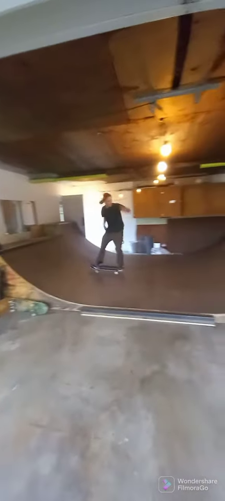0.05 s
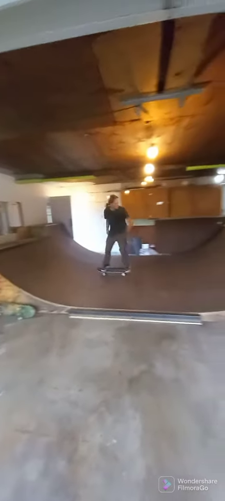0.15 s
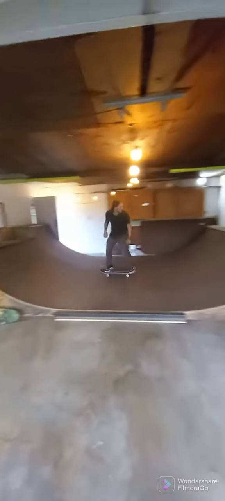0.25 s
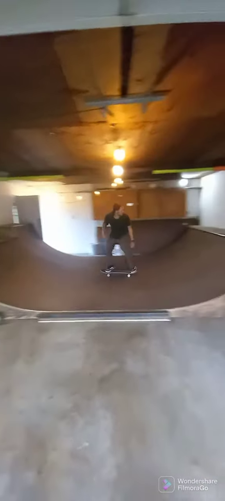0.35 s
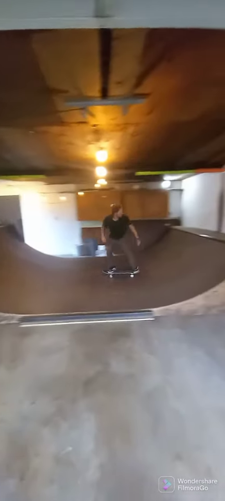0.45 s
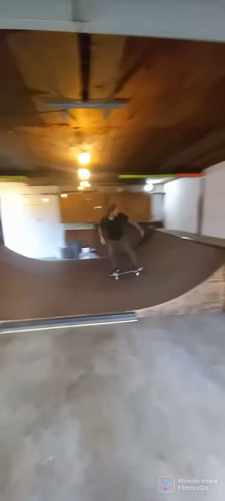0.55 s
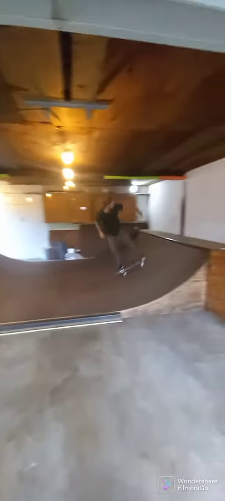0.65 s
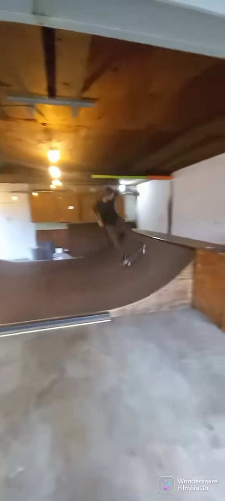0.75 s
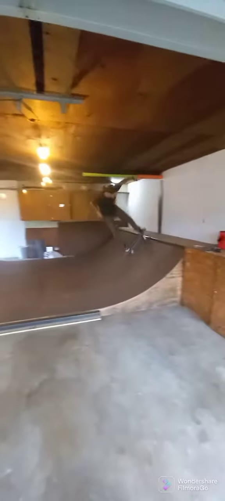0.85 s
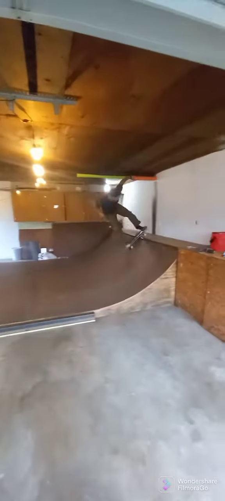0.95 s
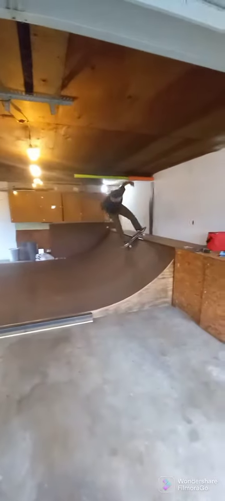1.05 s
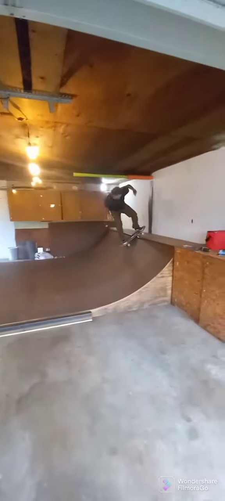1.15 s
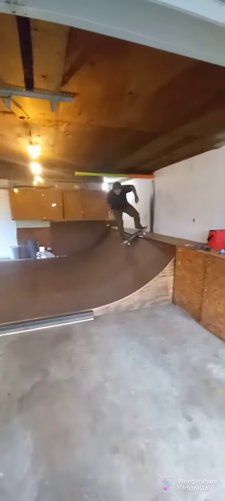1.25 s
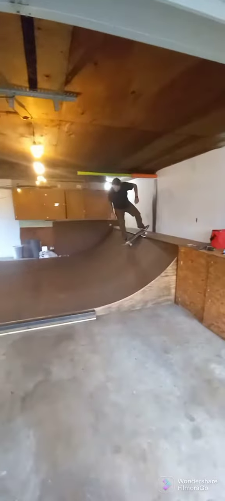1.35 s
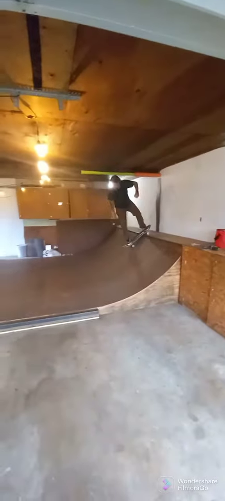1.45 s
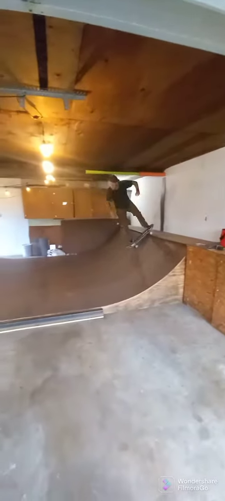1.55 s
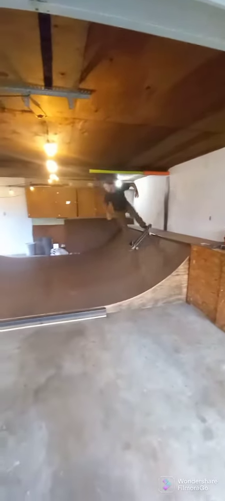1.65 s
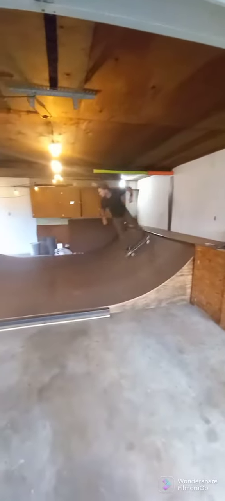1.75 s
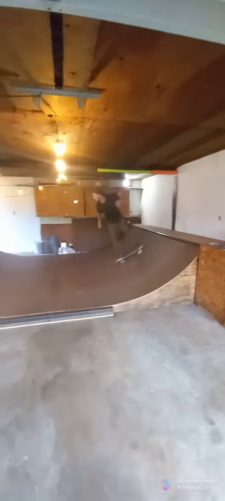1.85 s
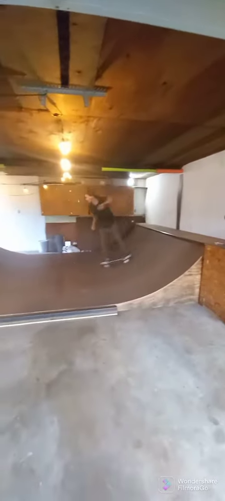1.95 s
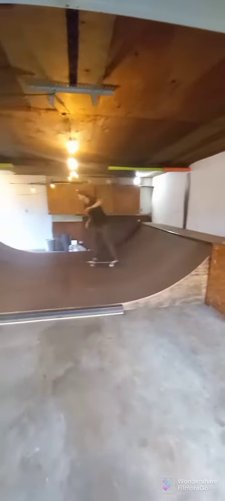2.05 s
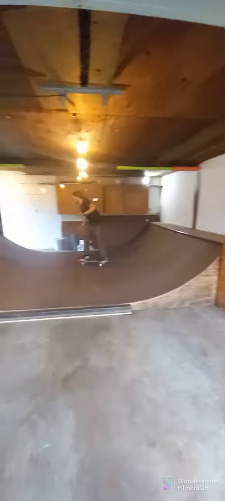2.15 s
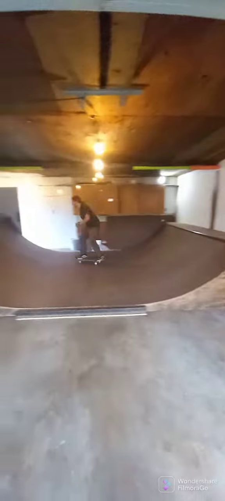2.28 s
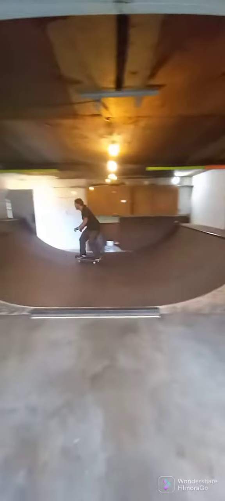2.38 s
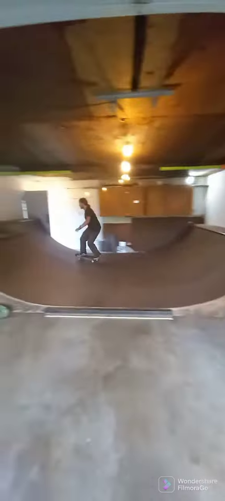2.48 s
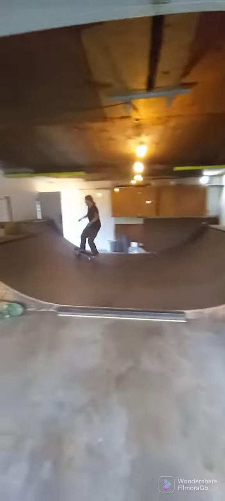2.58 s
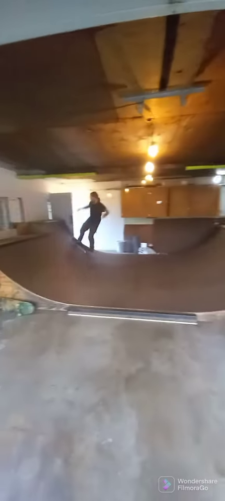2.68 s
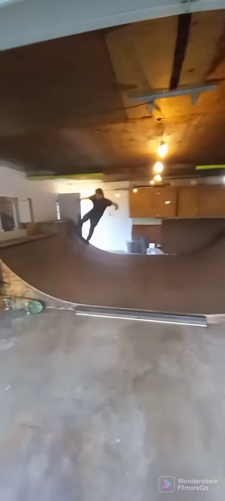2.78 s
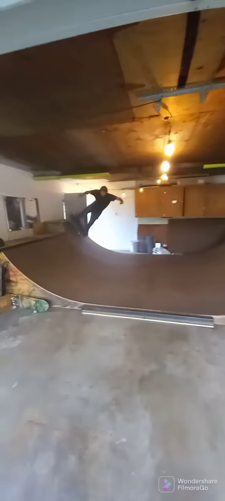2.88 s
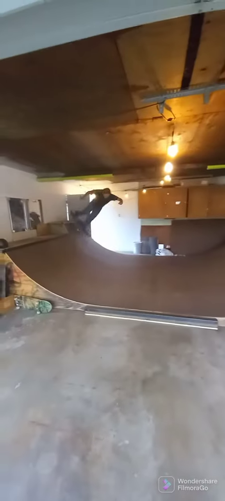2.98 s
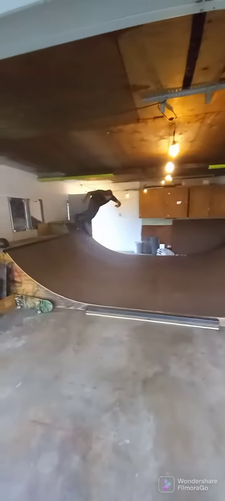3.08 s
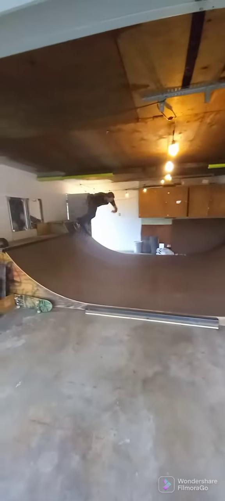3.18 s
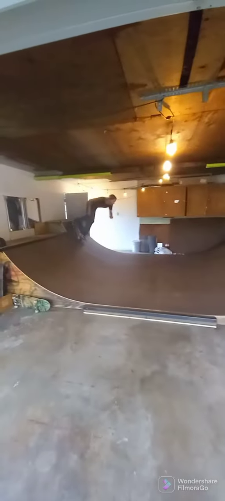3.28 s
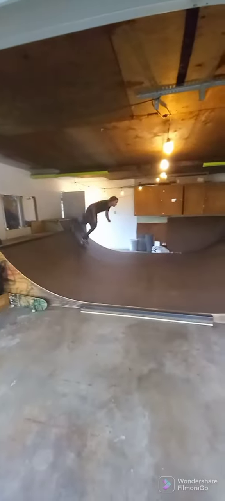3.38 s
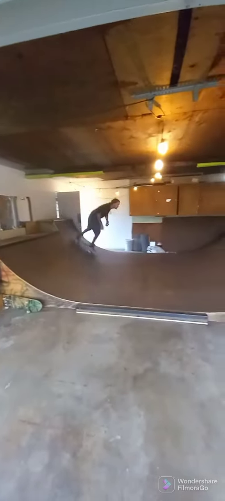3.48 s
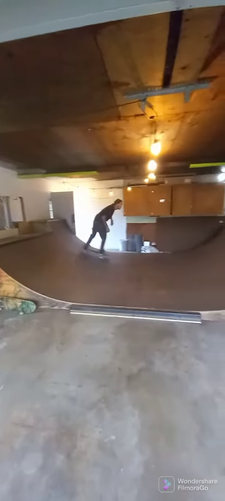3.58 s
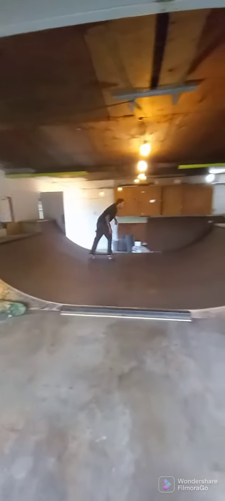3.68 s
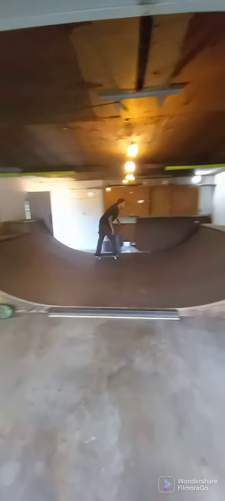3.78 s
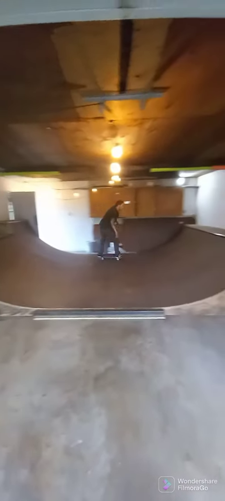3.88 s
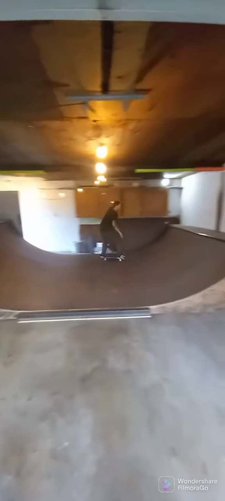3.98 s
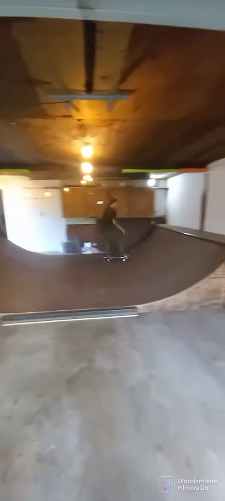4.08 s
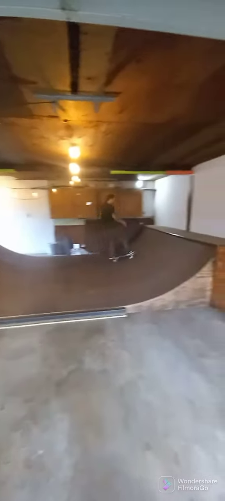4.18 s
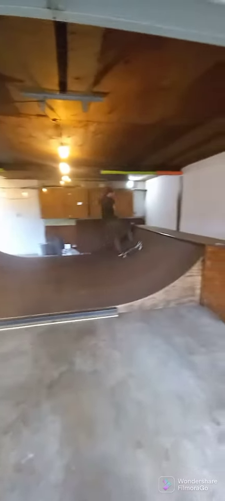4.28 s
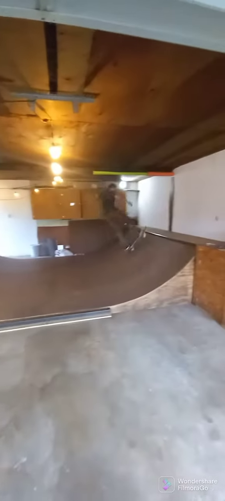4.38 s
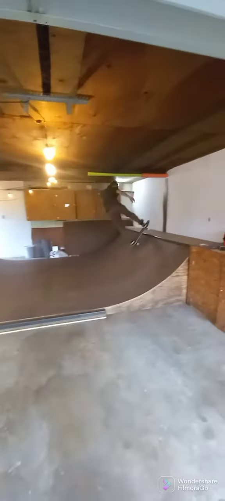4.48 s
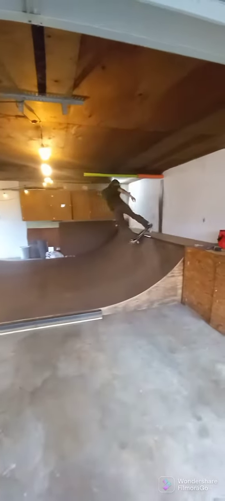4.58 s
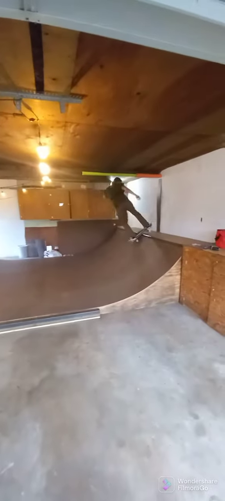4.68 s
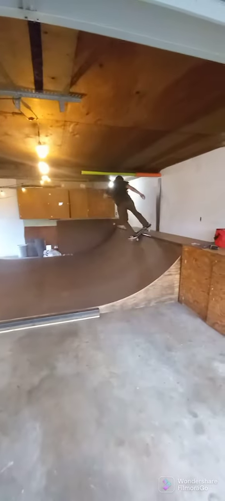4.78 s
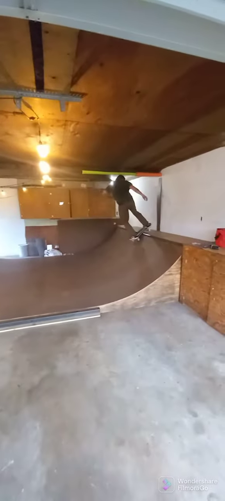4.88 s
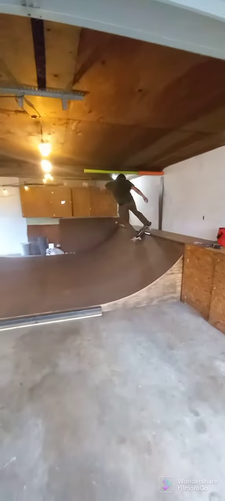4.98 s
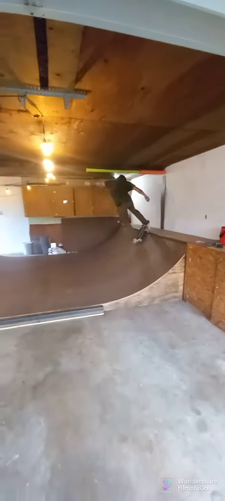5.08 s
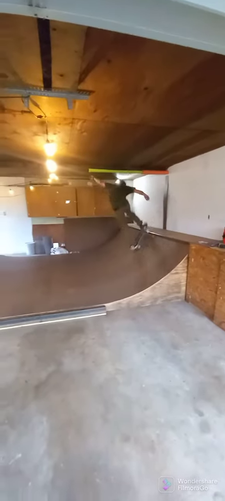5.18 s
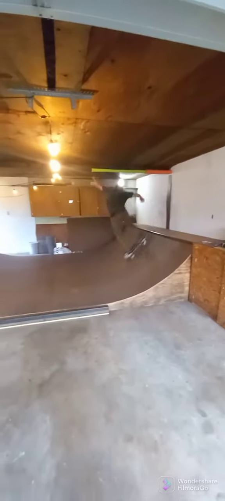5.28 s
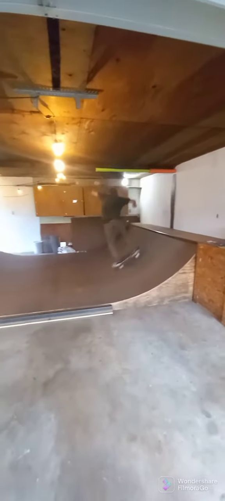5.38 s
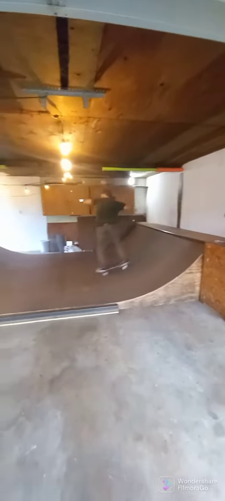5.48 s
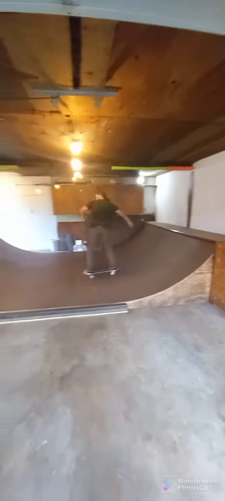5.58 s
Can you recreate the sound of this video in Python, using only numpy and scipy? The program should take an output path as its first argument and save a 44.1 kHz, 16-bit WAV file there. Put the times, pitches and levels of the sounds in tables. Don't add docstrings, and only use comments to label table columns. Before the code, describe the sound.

A skateboard rumbles back and forth on a hollow wooden ramp in an echoing garage, with sharp clacks at the steel edge.

```python
import sys
import numpy as np
from scipy import signal
from scipy.fft import rfft, irfft, next_fast_len
from scipy.io import wavfile
from scipy.ndimage import map_coordinates

SR = 44100
rng = np.random.default_rng(int(sys.argv[2]) if len(sys.argv) > 2 else 0)


def undo_db(level):
    steps = np.asarray(level, float) / 20
    return 10 ** steps


def master_out(mix):
    frames = np.transpose(np.atleast_2d(mix))
    ceiling = np.clip(frames, -1, 1)
    pcm = np.round(ceiling * 32767).astype(np.int16)
    wavfile.write(sys.argv[1], SR, pcm)


N = 248283


def unit(x):
    return x / np.sqrt(np.mean(x ** 2) + 1e-20)


def along(points, hz):
    f, value = np.transpose(points)
    return np.interp(np.log(hz + 1), np.log(f + 1), value)


def filtered(x, response):
    size = next_fast_len(x.shape[-1] + SR // 4)
    spectrum = rfft(x, size) * response(np.fft.rfftfreq(size, 1 / SR))
    return irfft(spectrum, size)[..., :x.shape[-1]]


def modes(table):
    def response(f):
        total = 0
        for k, (centre, width, db) in enumerate(table):
            ring = 1j * f * width / (centre * centre - f * f + 1j * f * width)
            total = total + (-1) ** k * undo_db(db) * ring
        return total
    return response


def causal(gain):
    cepstrum = irfft(np.log(gain + 1e-6))
    half = len(cepstrum) // 2
    cepstrum[1:half] *= 2
    cepstrum[half + 1:] = 0
    return np.exp(rfft(cepstrum))


def wobble(rate):
    knots = rng.standard_normal(int(N * rate / SR) + 4)
    return map_coordinates(knots, [np.arange(N) * rate / SR])


def bumps(size, rate, scatter_db, smooth):
    chance, height, grain = rng.random(size), rng.exponential(size=size), rng.standard_normal(size)
    kicks = np.sign(grain) * (chance < rate / SR) * undo_db(scatter_db * np.minimum(height, 2.2))
    return unit(kicks) + smooth * grain


def lingering(db, t60):
    keep = 10 ** (-6 / (t60 * SR))
    return np.sqrt(signal.lfilter([1 - keep], [1, -keep], undo_db(2 * db)))


# (f/Hz, width/Hz, level/dB)
BOOM = [(66.3, 8.7, -7.5), (84.7, 12.3, 1), (111.5, 16.3, 5), (114.2, 18.9, 0.5), (135, 1.8, -31)]
# (f/Hz, width/Hz, level/dB)
SPANS = [(115.6, 16.8, -0.5), (123.2, 16.3, 0), (156, 20.8, -5), (170, 16, -3)]
# (f/Hz, width/Hz, level/dB)
PANEL = [(178, 33.3, 1.5), (199.8, 26.8, -0.5), (241.4, 12, 2.5), (331.6, 38, -1), (380, 57, -4),
         (440, 106, -14), (556, 134, -15), (632, 146, -15.5), (704, 170, -27.5)]


def rumble(load):
    pressure, speed, short, stall = ride()
    road = bumps(N, rate=200, scatter_db=1, smooth=0.5)
    short = np.clip(short, 0, 1)
    air = unit(filtered(road, modes(BOOM)))
    spans = unit(filtered(road, modes(SPANS)))
    hollow = np.sqrt(1 - short) * air + np.sqrt(short) * spans
    panels = sum(undo_db(2.2 * wobble(18)) * filtered(road, modes(PANEL[first::3])) for first in range(3))
    hollow_db = -24 + pressure + stall + 1.8 * load
    panel_db = -27.5 + speed + 1.7 * stall + 0.69 * load
    return undo_db(hollow_db) * hollow + undo_db(panel_db) * unit(panels)


# (t/s, rider's pressure level/dB, wheel speed level/dB, share of short spans underfoot 0-1)
RIDE = [(0, 22, 12.5, 0.78), (0.079, -6, -6, 0.4), (.45, -1.5, -3, 0.37), (.72, 1.5, 1.5, 0.75),
        (.93, -4, -8.5, 0.13), (1.7, -6, -7.5, 0.36), (2.07, -6.5, 0, 0.43), (2.32, -3, -5.5, 0),
        (2.5, -0.5, 2, 0.36), (2.75, 5.5, 4.5, 1), (2.97, -2.5, 0.5, 0.1), (3.5, 3.5, -6, 0),
        (3.7, -2.5, 0.5, 0.53), (4.03, -1, 2, 0.4), (4.3, 6.5, 4, 0.25), (4.47, -3, -6.5, 0),
        (5.15, -8, -4, 0.36), (5.63, 1.5, 5.5, 0.4)]


def ride():
    s, *controls = np.transpose(RIDE)
    t = np.arange(N) / SR
    return *[np.interp(t, s, control) for control in controls], stalled()


# (wheels unload t/s, wheels land t/s, what still trembles level/dB)
STALLS = [
    (1.17, 1.665, -40),
    (3.027, 3.426, -28),
    (4.503, 4.665, -4),
    (4.723, 5.11, -15.5),
]


def stalled():
    unload_db_per_s, land_s = 136, 0.03
    t, loss = np.arange(N) / SR, 0
    for up, down, db in STALLS:
        fallen = min(up - db / unload_db_per_s, down - 2 * land_s)
        loss = loss + np.interp(t, [up, fallen, down - land_s, down], [0, db, db, 0])
    return loss


# (f/Hz, level/dB per Hz)
WHEEL = [(290, -46), (500, -3), (897, -8), (1180, -12), (1480, -8.5), (2430, -23), (3000, -20.5),
         (3900, -51), (6600, -120)]
# (f/Hz, level/dB per Hz)
BEARING = [(1350, 0), (2300, 0), (2800, -4), (3320, 1), (3670, -1.5), (4050, -1), (4500, -2.5), (5520, -3),
           (6720, -5.5), (8110, -12), (10500, -14), (15100, -13.5), (16300, -24)]


def hiss(load):
    _, speed, _, stall = ride()
    tread = bumps((2, N), rate=330, scatter_db=-0.5, smooth=2.1)
    tread = unit(filtered(tread, lambda hz: undo_db(along(WHEEL, hz))))
    tread_db = -42 + 0.2 * speed + 0.68 * stall + 0.6 * load
    balls = bumps((2, N), rate=1100, scatter_db=14.0, smooth=4.8)
    balls = unit(filtered(balls, lambda hz: undo_db(along(BEARING, hz))))
    spin_power = undo_db(2 * (-51 + 0.25 * speed + 0.24 * stall))
    spin_db = 10 * np.log10(spin_power + carving())
    chatter_db = 0.5 * load + 2 * wobble(45)
    return lingering(tread_db, t60=0.76) * tread + lingering(spin_db + chatter_db, t60=0.21) * balls


# (middle t/s, length t/s, level/dB)
CARVES = [(0.0, 0.017, -35), (0.114, 0.097, -40), (0.31, 0.027, -54), (0.573, .12, -41),
          (0.796, 0.047, -42), (.89, .08, -42), (1.527, 0.05, -49), (2.005, .06, -40), (2.35, 0.18, -45),
          (2.51, .04, -43.5), (2.73, 0.21, -35.5), (2.916, 0.15, -46), (3.534, 0.11, -40.5),
          (3.798, 0.11, -36.5), (3.964, 0.17, -44.5), (4.201, 0.086, -33.5), (4.413, 0.12, -38),
          (4.585, 0.12, -44.5), (4.916, 0.11, -50.5), (5.092, 0.079, -40.5), (5.22, 0.07, -42),
          (5.5, 0.077, -42.5), (5.63, 0.08, -39)]


def carving():
    t = np.arange(N) / SR
    return sum(undo_db(2 * db) * np.exp(-(2 * (t - s) / length) ** 2) for s, length, db in CARVES)


# (centre f/Hz, width f/Hz)
BLOW_BANDS = [
    (110, 200),
    (550, 950),
    (2000, 2300),
    (5200, 4000),
    (11500, 8500),
]
# (f/Hz, width/Hz, level/dB)
DECK = [(324, 25, -1.5), (677, 108, 3), (897, 8.8, -4.5), (1198, 12, -5), (1453, 51, -1), (1734, 44, -2),
        (2096, 140, -3.5), (2500, 31, -1.5), (2950, 27, -9.5)]
# (f/Hz, level/dB)
MIC = [(25, -17.5), (50, 3), (80, 4.5), (6500, 1), (8200, -1), (10000, -4.5), (12500, 0), (16000, -7)]
# (t/s, strength level/dB, weight level/dB, wood level/dB, edge level/dB)
STRIKES = [(0.94, -13, -6.5, 8.5, -9.5), (0.9574, -19.5, 10, 11, -7), (0.995, -19.5, 16.5, 6, -4.5),
           (1.046, -8, -7, -8.5, -15.5), (1.061, -19, -2, -0.5, -14), (1.4351, -32, 5, -1.5, -2),
           (1.5049, -41, 22, 15, 2), (1.5212, -32.5, 18.5, 11, -7), (1.6702, -27.5, 12, 5.5, -7),
           (1.6988, -28.5, -4, 7, -6), (1.766, -25.5, -4, 3.5, -1), (1.7791, -22.5, 10.5, 3.5, -11),
           (2.972, -19.5, 3, 9, -6), (2.995, -18.5, 12.5, 3.5, -7), (3.02, -25.5, 8.5, 0, -10),
           (3.3689, -20, -3, 8, 0), (3.385, -16, 15, 6, -7), (4.6408, -7.5, -5, -3, -24),
           (4.6568, -30.5, 13, 2, 2), (4.8663, -35.5, -2, 6, -2), (4.9325, -37, 6.5, 8.5, 2),
           (5.0789, -30.5, 17.5, 12.5, -6), (5.1813, -26, 9.5, 11, -3.5), (5.304, -16.5, 18, 11, -7)]
# (t/s, strength level/dB, weight
# level/dB, wood level/dB, edge level/dB)
JOINTS = [(0.012, -48, 24, 23, -15), (0.117, -41.5, 25, 33, -15), (0.2934, -44.5, 1, 16, 8),
          (.672, -43.5, 22, 20.5, -11), (0.8512, -31.5, 13.5, 9.5, -3), (2.069, -46, 25, 27, -15),
          (2.419, -43, 24, 9, -15), (2.5028, -34.5, 13, 9, -1), (2.62, -34, 24.5, 10, -15),
          (2.79, -35, 12, 22, -14), (2.9, -26.5, 19, 9.5, -8), (3.13, -50, 28, 0, -12),
          (3.189, -45, 12, 0, -19), (3.609, -34.5, 20.5, 13, -4), (3.8385, -44, 16, 23, -10),
          (3.9465, -33.5, 19, 15.5, -17), (4.1573, -50, 13, -6, -6), (5.5046, -37.5, 23, 24, -12)]


def blows():
    out, t = np.zeros((2, N + SR)), np.arange(SR // 4) / SR
    centre, width = np.array(BLOW_BANDS, float).T
    ring = lambda hz: 1 + np.abs(modes(DECK)(hz)) + 1.57 * np.abs(modes(BOOM)(hz))
    # level in dB, then dB per dB of edge
    rows = [(*row, -6, 0.01) for row in STRIKES] + [(*row, -15.5, -0.4) for row in JOINTS]
    for s, db, weight_db, wood_db, edge_db, crack_db, sharper in rows:
        splutter = rng.standard_normal(len(t)) * np.exp(-(t / 0.0035) ** 2)
        click = t == 0
        push = np.array([click, 0.18 * click + splutter / np.linalg.norm(splutter)])
        band_db = np.array([weight_db, wood_db, 0, crack_db + sharper * edge_db, edge_db])
        per_hz = band_db - 10 * np.log10(width / width[2])
        centre[1] = np.clip(726 * 2 ** (-weight_db / 22), 304, centre[2] / 2)
        tone = np.c_[centre, per_hz]
        colour = lambda hz: causal(undo_db(along(tone, hz) + along(MIC, hz)) * ring(hz))
        start = round(s * SR)
        out[:, start:start + len(t)] += undo_db(db + 28) * filtered(push, colour)
    return out[:, :N]


# (t/s, lag of the left port in ms)
PLACE = [(0, 0.077), (1, .3), (1.8, 0.17), (2.3, 0.052), (3, -0.22), (3.4, -0.32), (3.9, 0.136),
         (4.6, 0.31), (5.3, 0.38), (5.63, 0.13)]


def direct(x):
    lag = np.interp(np.arange(N) / SR, *np.transpose(PLACE)) * SR / 2000
    late = lambda hz, s: np.exp(-2j * np.pi * hz * s)
    bright = lambda hz: (1 + 2.2j * hz / 2500) / (1 + 1j * hz / 2500)
    straight = lambda hz: (1 + 0.25 * late(hz, 0.0025)) * bright(hz)
    walls = lambda hz: (0.83 * late(hz, 0.0138) - 0.58 * late(hz, 0.022)) / (1 + 1j * hz / 3000)
    x = filtered(x, lambda hz: straight(hz) + walls(hz))
    return np.array([map_coordinates(x, [np.arange(N) - side * lag], mode="nearest") for side in (1, -1)])


# (f/Hz, t/s)
ROOM = [(60, 0.37), (250, 0.31), (1000, 0.46), (4000, 0.51), (12000, 0.45)]


def garage(x):
    hop = SR // 12
    out, padded = np.zeros((2, N + 2 * SR)), np.pad(x, (hop, 2 * hop))
    fade = np.sin(np.pi * np.arange(2 * hop) / (2 * hop))
    for start in range(0, N + hop, hop):
        hz, t, z = signal.stft(rng.standard_normal((2, SR // 2)), SR, nperseg=256)
        fall = undo_db(-60 * t / along(ROOM, hz)[:, None])
        fall = fall * (1.4 - np.exp(-t / 0.006)) * (1 + 0.46 * np.exp(-t / 0.026))
        fall = fall / np.linalg.norm(fall, axis=1, keepdims=True)
        tail = signal.istft(z * fall, SR, nperseg=256)[1]
        tail = tail / np.linalg.norm(tail[0])
        moment = padded[start:start + 2 * hop] * fade
        wet = signal.fftconvolve(moment[None], tail, axes=1)
        out[:, start:start + wet.shape[1]] += wet
    return out[:, hop:hop + N]


# (f/Hz, correlation -1 to 1)
ALIKE = [(60, 0.95), (130, 1), (290, 0.86), (640, -0.025), (1410, -0.014), (3100, 0.07), (6820, 0.11),
         (15000, -0.019)]
# (f/Hz, level/dB)
LEAN = [(60, -2.5), (110, 0.5), (200, -1), (380, -4), (700, 1), (1290, -3.5), (2380, 0), (4400, -3),
        (8120, 1), (15000, -1)]


def pair(x):
    turn = lambda hz: np.arccos(np.clip(along(ALIKE, hz), -1, 1)) / 2
    mid, side = filtered(x, lambda hz: np.array([np.cos(turn(hz)), np.sin(turn(hz))]))
    lean = lambda hz: undo_db(along(LEAN, hz) / 2 * np.array([[1], [-1]]))
    return filtered(np.array([mid + side, mid - side]), lean)


# (f/Hz, level/dB per Hz)
FLOOR = [(24, -45), (40, 14.5), (130, -1), (322, -15), (1650, -8), (2730, -30), (4510, -49), (15100, -71),
         (16300, -49)]


def room_hum():
    noise = rng.standard_normal((2, N))
    return undo_db(-47.5) * unit(filtered(noise, lambda hz: undo_db(along(FLOOR, hz))))


def scene():
    load = np.clip(wobble(18), -1.5, 1.5)
    roll = rumble(load)
    push, crack = blows()
    diffuse = garage(roll + push) + hiss(load) + room_hum()
    return undo_db(1.5) * pair(diffuse) + direct(undo_db(-6.5) * roll + undo_db(-10) * crack)


def roll_off(x):
    return signal.sosfilt(signal.butter(12, 16420, fs=SR, output="sos"), x)


def record(dry):
    top, hard, low_hz = 0.97, 4, 40
    ports = filtered(dry, lambda hz: (1j * hz / (low_hz + 1j * hz)) ** 2)
    hissing = ports + undo_db(-70) * rng.standard_normal(dry.shape)
    rounded = hissing / (1 + np.abs(hissing / top) ** hard) ** (1 / hard)
    mix = filtered(rounded, lambda hz: hz < 16000)
    return roll_off(mix)


dry = scene()
out = record(dry)
master_out(out)
```